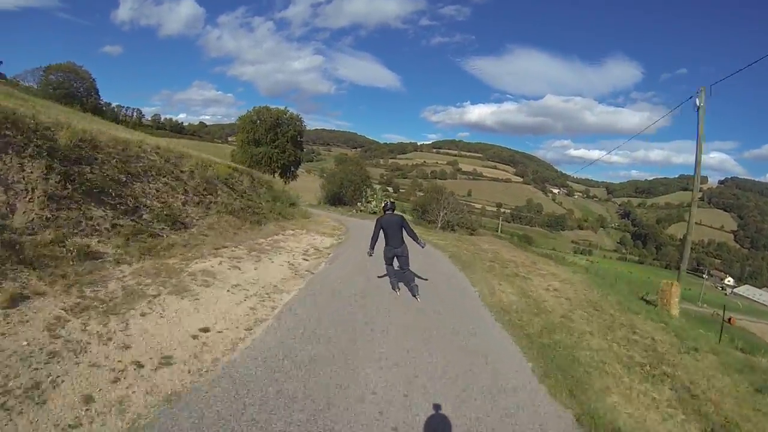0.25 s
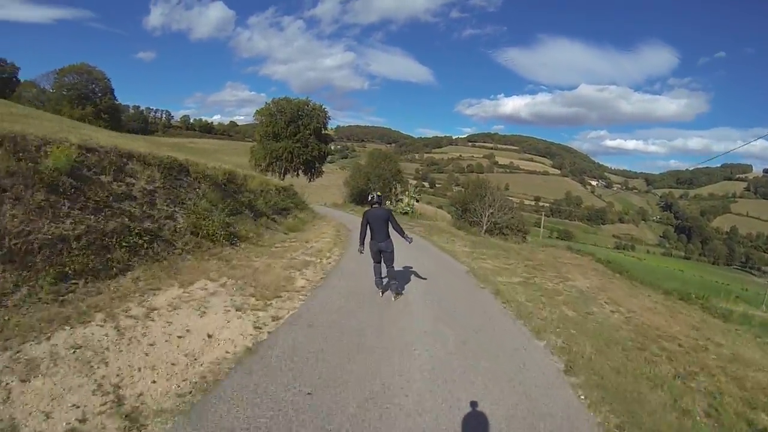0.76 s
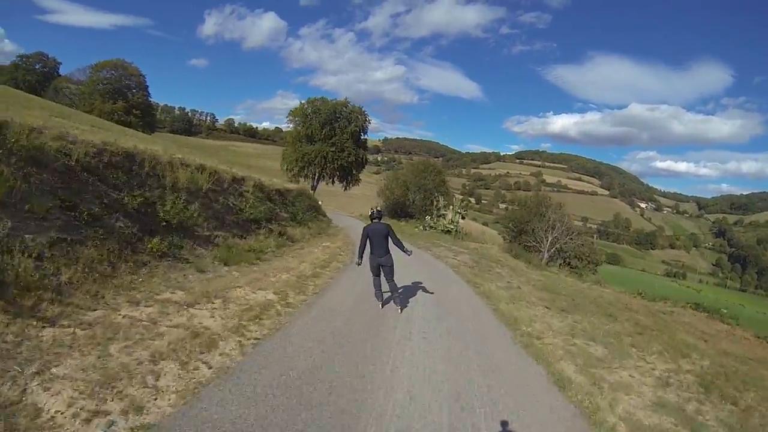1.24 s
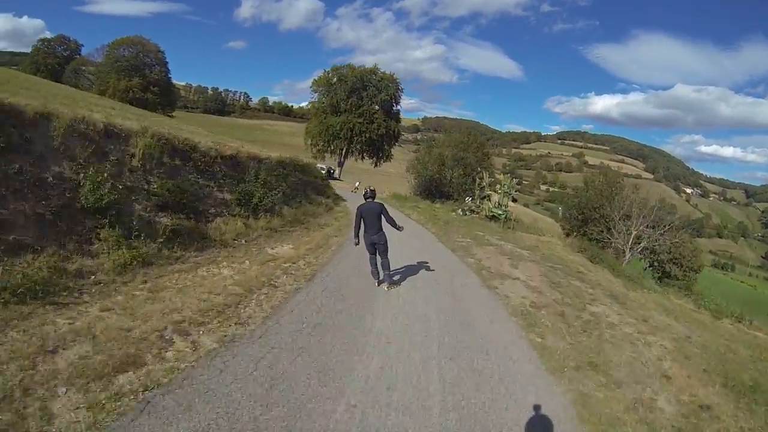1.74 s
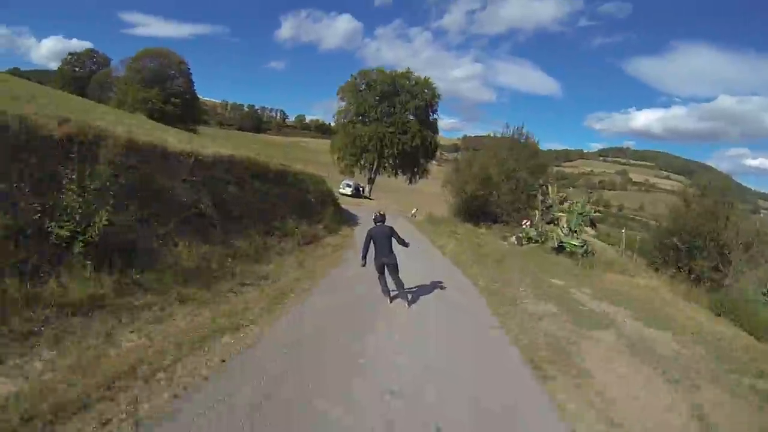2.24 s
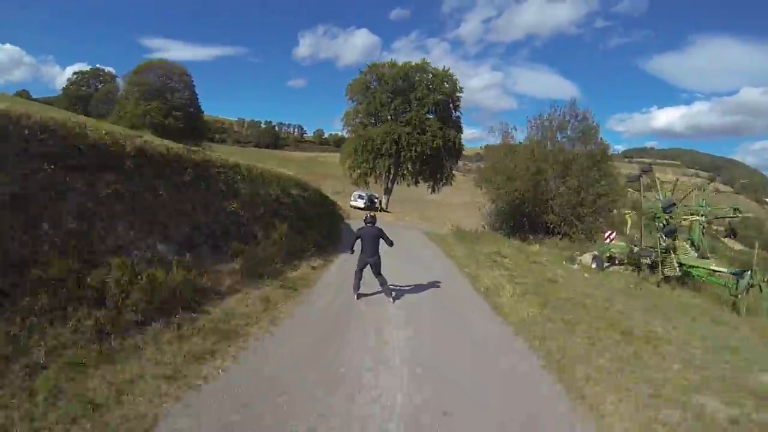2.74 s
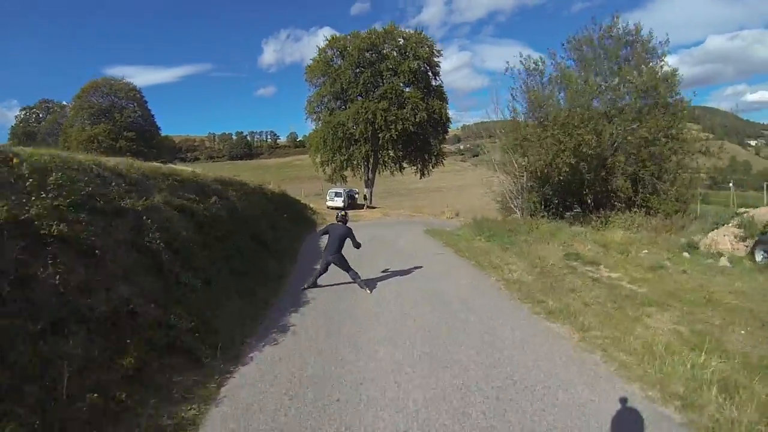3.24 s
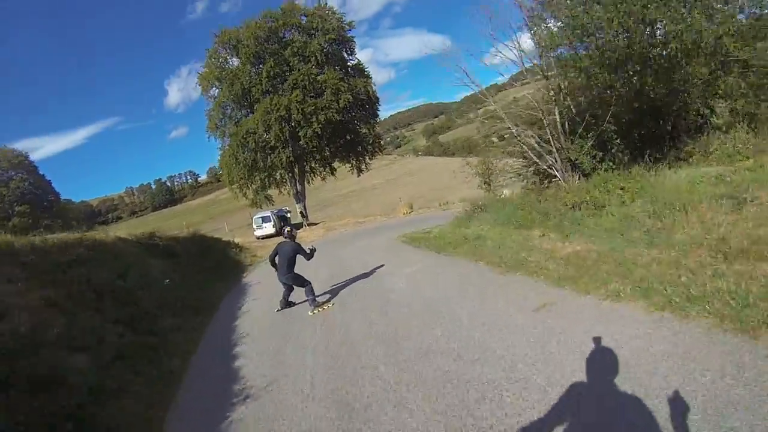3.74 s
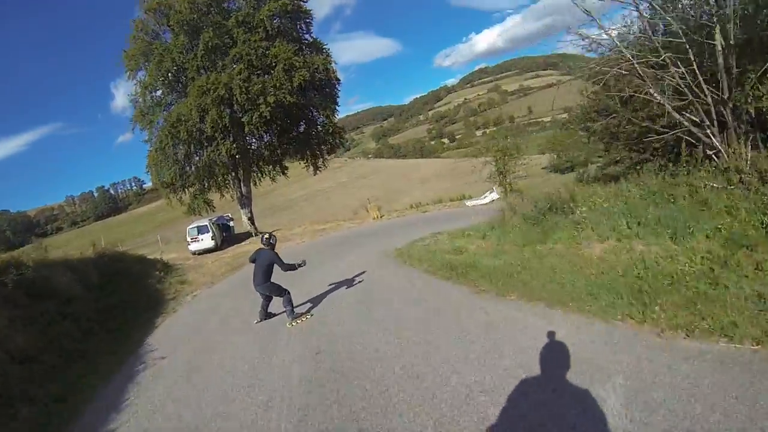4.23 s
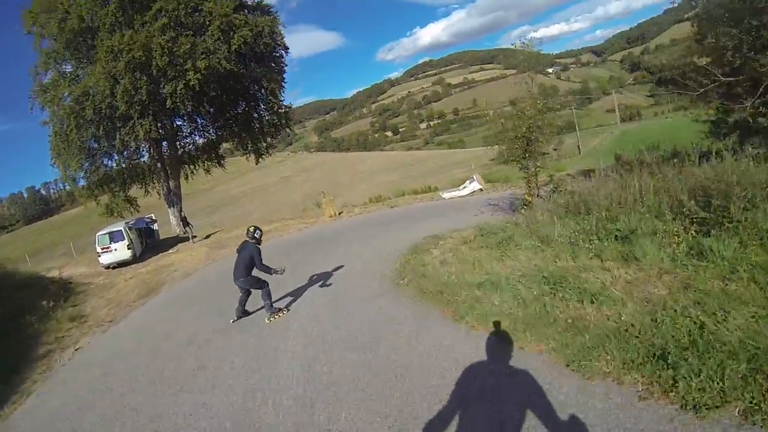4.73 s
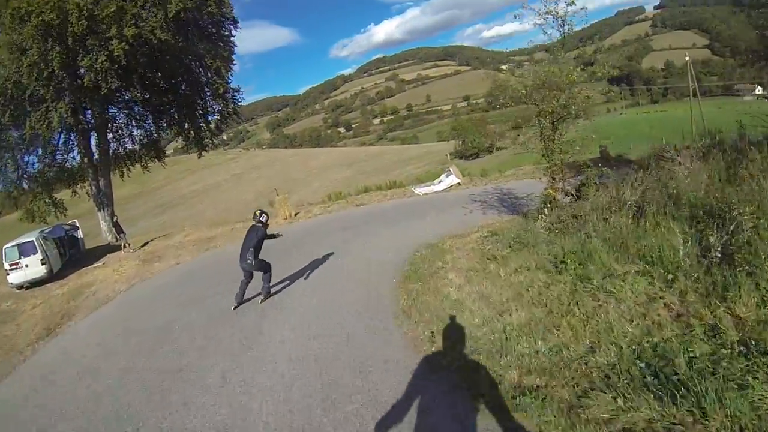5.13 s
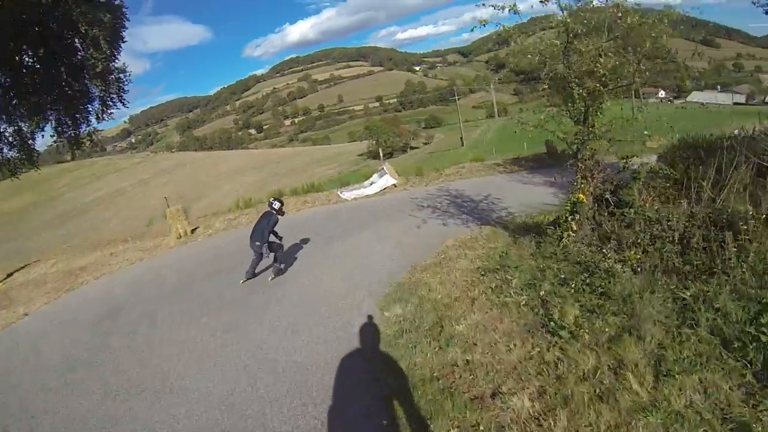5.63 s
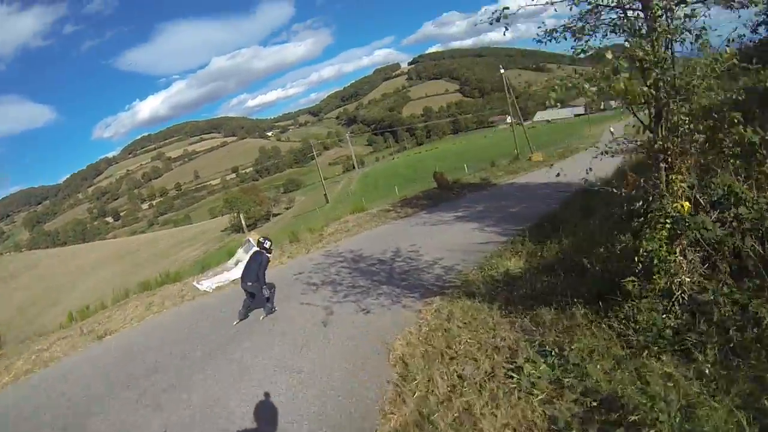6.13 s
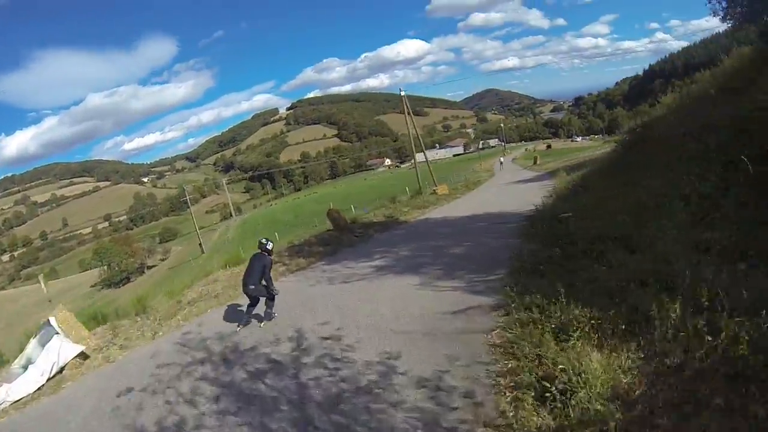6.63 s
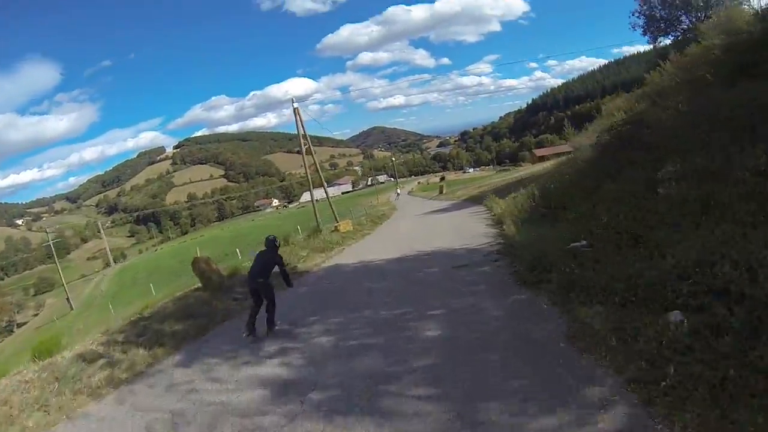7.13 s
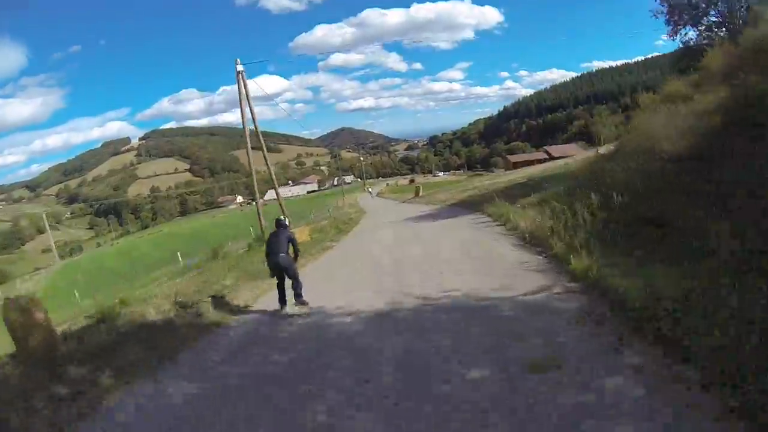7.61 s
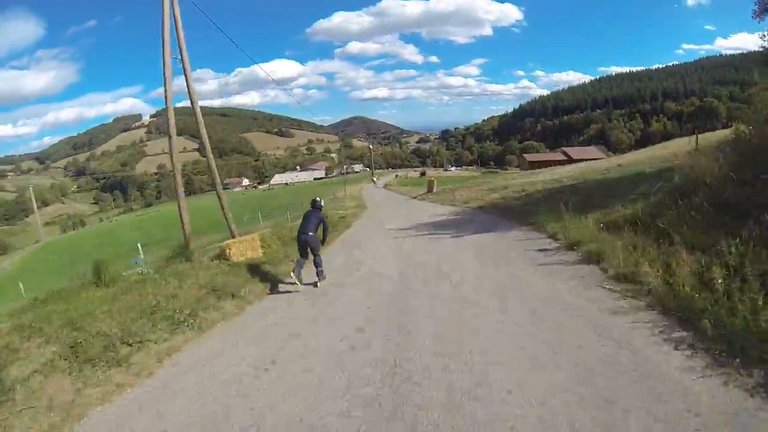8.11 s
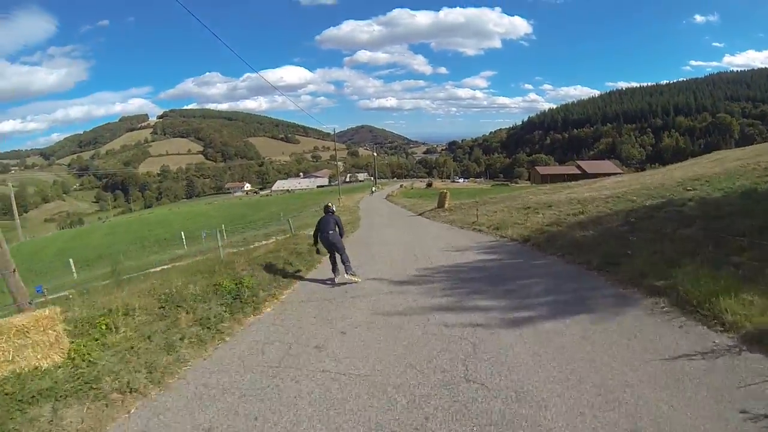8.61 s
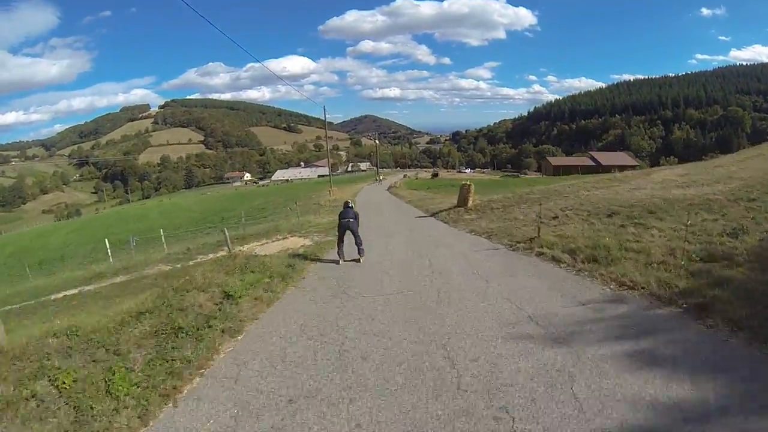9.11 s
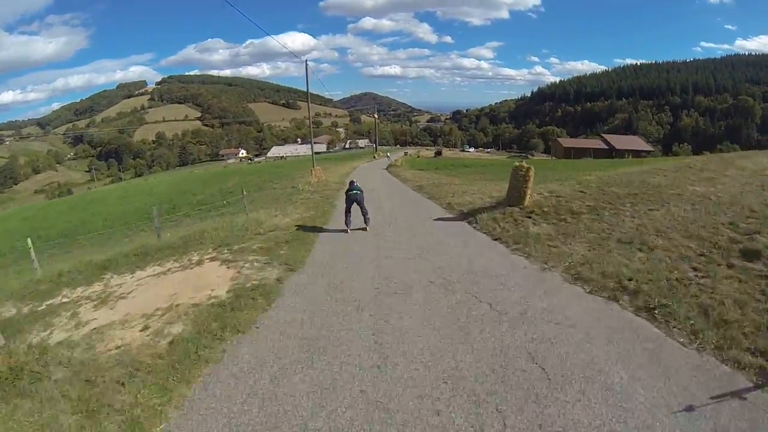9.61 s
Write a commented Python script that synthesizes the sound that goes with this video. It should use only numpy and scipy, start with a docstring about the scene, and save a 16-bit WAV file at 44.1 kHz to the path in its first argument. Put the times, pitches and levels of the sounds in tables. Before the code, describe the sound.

From 0 to 3.3 seconds, small hard skate wheels roar over coarse asphalt, mid-heavy and grainy with a gritty edge, while wind thumps deep and irregularly at a helmet microphone. Dull bumps knock near 0.2 and 1.5 seconds, with tiny high grit ticks; stronger knocks come at 2.9, 3.3 and 3.5. At 3.3 the skater brakes: a fine bright scrubbing hiss swells quickly, then slowly sags until about 5.2. The roar drops steeply from 4 seconds, exposing booming gusts and an airy cross rush around 4.5 to 5. Between 5.4 and 7.3 the wheels roll very quietly with a hollow singing tone, under gentler gusts and faint microphone hiss. From 7.4 pushes rasp softly, clearer at 9.1, 9.5 and 9.8, as rolling builds again, still below its opening level, with a light bump near 9. Open air, no echo.

```python
"""Inline skates, country road

A fast run heard from a microphone in the camera on the skater's helmet: wind at the housing, wheels a body length below.
Random stone hits ring the skates' resonances; they scrub and hiss into a bend, roll quietly through it, then pick up.
Shaped noise makes the wind, road shake and microphone hiss; short rings and decaying noise make grit and bumps."""
import sys
import numpy as np
from scipy import signal
from scipy.fft import rfft, irfft, next_fast_len
from scipy.io import wavfile
from scipy.ndimage import uniform_filter1d

SR = 44100
rng = np.random.default_rng(int(sys.argv[2]) if len(sys.argv) > 2 else 0)


def int16_out(signal):
    """Quantize to a 16-bit WAV file."""
    q = np.round(np.clip(np.atleast_2d(signal).T, -1, 1) * 32767)
    wavfile.write(sys.argv[1], SR, q.astype(np.int16))


N = 434818
TIME_S = np.arange(N) / SR

# Layer levels are before the trims set in scene(); colours give only a shape, scaled later.

# Microphone hiss, colour: pitch_hz, density_db (per Hz)
HISS_COLOUR = [(1000, -2), (4200, 7), (5200, 4.5), (6200, 1), (8000, -2.5), (9500, -7.5), (10050, 3),
               (11000, -4.5), (12000, -6), (12900, 3), (14400, -4), (15000, 0.5)]
# Thin whine in that hiss: pitch_hz, width_hz, lift_db
HISS_WHINE = [(12647, 14, 17), (12707, 12, 12), (13127, 14, 11)]

# Steady wind on the housing between gusts, with a lull in the bend: time_s, level_db
STEADY_WIND = [(0.0, -20), (0.55, -22), (0.87, -29.5), (1.2, -23), (1.35, -26.5), (2.0, -24), (2.2, -21.5),
               (2.85, -19.5), (3.2, -22.5), (3.9, -18.5), (4.28, -27.5), (4.6, -23.5), (5.05, -26),
               (5.65, -34.5), (6.05, -24), (7.4, -27), (8.3, -32), (9.86, -27)]
# Gusts: peak_time_s, peak_db, length_s (sigma of the power bell), boom_db (relative to the slow buffeting)
WIND_GUSTS = [(0.342, -16.5, 0.046, -5.5), (0.746, -23.5, 0.041, 8), (1.033, -23, 0.043, -11),
              (1.476, -13, 0.022, 7), (1.763, -20, .04, -4.5), (2.483, -17.5, 0.022, -3.5),
              (3.598, -15, .03, -5), (3.67, -18, 0.031, 17), (4.52, -16, 0.046, 3), (4.771, -19.5, .04, 3),
              (4.942, -18, .03, 10), (5.184, -18, 0.046, 2), (6.163, -20, 0.058, -1),
              (6.405, -20.5, 0.022, -11), (6.908, -21.5, 0.027, 1), (7.167, -21.5, 0.049, -4),
              (7.617, -22.5, 0.055, -7.5), (8.036, -27, 0.021, -4.5), (9.055, -27, 0.03, -12),
              (9.7, -26, 0.11, -15)]
# Slow buffeting of the housing, colour: pitch_hz, density_db (per Hz)
BUFFET_COLOUR = [(4, -22.5), (12, -3.5), (22, -7), (33, 2), (42, -1.5), (52, -10.5), (70, -21.5),
                 (150, -39)]
# Low boom of the housing, colour: pitch_hz, density_db (per Hz)
BOOM_COLOUR = [(35, -11), (52, -12), (64, -4), (75, 2.5), (86, -6.5), (98, -20.5), (112, -26), (200, -53)]
# Small, quick eddies, colour: pitch_hz, density_db (per Hz)
EDDY_COLOUR = [(60, -22), (95, 11.5), (125, 1.5), (160, -7), (220, -19.5), (500, -28)]
# Air rushing across the housing as the head turns in the bend: time_s, level_db
CROSSWIND_LEVEL = [(4.0, -61), (4.5, -53), (4.7, -47.5), (4.95, -56.5), (5.22, -54.5), (5.45, -74),
                   (5.95, -56.5), (7.6, -55.5), (8.4, -61)]
# That rush, colour: pitch_hz, density_db (per Hz)
RUSH_COLOUR = [(150, -23), (350, 3.5), (480, -4), (620, -1.5), (850, 0), (1150, 4), (1500, -17),
               (3000, -23), (4400, -32), (5200, -23), (6000, -34)]

# Road vibration carried up to the housing, weakest at the apex of the bend: time_s, level_db
DRONE_LEVEL = [(0.0, -36.5), (2.0, -38.5), (2.25, -35.5), (3.9, -39.5), (4.35, -46), (4.8, -48.5),
               (5.5, -56), (6.8, -51.5), (9.86, -44.5)]
# That vibration, colour: pitch_hz, density_db (per Hz)
DRONE_SHAPE = [(70, -7.5), (110, 7), (170, 3.5), (250, 0), (370, 0.5), (480, -9), (700, -20.5),
               (1500, -25.5)]

# Grit flicked by the wheels: start_s, level_db, ring_hz, t60_s
GRIT_TICKS = [(0.157, -43, 7200, .012), (1.456, -49, 10400, .02), (1.505, -53, 10800, .01),
              (3.7205, -41, 8400, .009), (3.722, -43, 10100, .009), (5.029, -58, 10500, .012)]
# Knocks of the wheels over bumps in the road: time_s, level_db, t60_s
ROAD_BUMPS = [(0.15, -29, 0.079), (0.265, -27, .06), (1.491, -25, 0.2), (2.88, -24.5, 0.35),
              (3.315, -24.5, 0.11), (3.54, -24, 0.27), (5.555, -44.5, 0.23), (7.575, -43, 0.25),
              (9.055, -34, .06), (9.45, -41, .07)]

# Ring of the wheels that stands out after the bend: time_s, level_db (relative to the roar)
SONG_LEVEL = [(4.2, -18), (5.1, -19), (5.5, -3), (6.3, -8), (7.2, -3), (8.2, -16), (9.2, -5), (9.86, -6.5)]
# That ring, colour: pitch_hz, density_db (per Hz)
SONG_SHAPE = [(700, -43.5), (950, -18), (1050, -3), (1120, 2), (1200, 0.5), (1300, -14), (1700, -41)]
# Pushes on the way out of the bend, when the edged wheels rasp: peak_time_s, level_db, length_s (sigma)
EDGE_PUSHES = [(7.45, -63, .04), (7.63, -58, 0.04), (7.86, -58, 0.078), (8.25, -64, 0.089),
               (8.56, -62, 0.093), (8.78, -59, 0.12), (9.084, -51, 0.093), (9.464, -52.5, 0.11),
               (9.78, -49, 0.055)]
# The rasp, colour: pitch_hz, density_db (per Hz)
RASP_COLOUR = [(2500, -14), (2780, -7), (3050, -4), (3480, 1), (3680, -4), (3950, -12), (4500, -13),
               (6000, -40)]
# The scrub, colour: pitch_hz, density_db (per Hz)
SCRUB_COLOUR = [(1500, 13), (2000, 26), (2550, 25), (3000, 6), (3500, 10), (4200, 11), (5200, 12),
                (6000, -2.5), (7700, 2.5), (9500, -4), (10500, 0.5), (11900, -5), (14000, -5.5),
                (15000, -13)]
# Resonances of the scrub: pitch_hz, width_hz, lift_db
SCRUB_RESONANCES = [(3720, 220, 8.7), (6500, 450, 8), (8220, 460, 11.6), (9040, 280, 8.9), (12500, 350, 4),
                    (13400, 700, 6)]

# Pace of the run as the roar of the wheels: fast straight, braking into the bend, picking up: time_s, level_db
ROAR_LEVEL = [(0.0, -27), (0.35, -27), (0.9, -28.5), (2.0, -29.5), (2.2, -26.5), (2.7, -27.5), (3.45, -27),
              (3.85, -29), (4.1, -32), (4.25, -36.5), (4.62, -39.5), (4.9, -40.5), (5.04, -45.5),
              (5.4, -49), (6.3, -51.5), (7.3, -48.5), (7.85, -42.5), (8.45, -42), (8.65, -40),
              (9.86, -37.6)]
# Broad colour of the rolling skates: pitch_hz, density_db (per Hz)
SKATE_COLOUR = [(250, -23), (480, -8), (660, -9), (900, -2.5), (1250, 0.5), (1720, 0.5), (2050, -11),
                (2620, -10.5), (2950, -18), (4200, -29), (5400, -28), (6000, -39), (8800, -41), (9400, -48),
                (15000, -57.5)]
# Resonances of wheels, frames and housing: pitch_hz, width_hz, lift_db
SKATE_RESONANCES = [(989, 36, 6), (1096, 157, 4.5), (1535, 130, 2.5), (2274, 194, 6.5), (2754, 120, 10),
                    (3320, 240, 5), (3667, 230, 6.5), (4020, 41, 8.5), (4468, 160, 10), (4680, 44, 7.5),
                    (4640, 30, 1), (5040, 280, 1), (5430, 14, -3), (6590, 230, 6.5), (7500, 500, 2),
                    (8050, 350, 2.5)]

# Bands in which the levels are given: low_hz, high_hz
ROAR_BAND, EDGE_BAND, TOP_BAND = (900, 3000), (3000, 6000), (9500, 15000)
BUFFET_BAND, BOOM_BAND, BLUSTER_BAND = (15, 55), (55, 110), (100, 200)
DRONE_BAND, RUSH_BAND = (170, 450), (450, 800)
CUTOFF_HZ = 15200

# Roar at full pace; edge and eddies give their level there and the dB they gain per dB of roar
FULL_PACE_DB = -27.5
EDGE_DB, EDGE_FOLLOWS = -17, 0.57  # sharp edge, relative to the roar
BLUSTER_DB, BLUSTER_FOLLOWS = -40.5, 0.79
BLUSTER_PER_GUST = 1  # dB per dB of wind power above its mean
BLUSTER_SLIDE_DB = 6  # added at full slide, side-on to the wind
USUAL_BOOM_DB = -2  # boom relative to buffeting in the steady wind
# The slide into the bend, until the wheels grip again
SLIDE_START_S, SLIDE_ATTACK_S = 3.31, 0.03
SLIDE_END_S, SLIDE_RELEASE_S = 5.18, 0.15
# The lean on the wheels' edges, until the road straightens
LEAN_START_S, LEAN_ATTACK_S = 4.04, 0.18
LEAN_END_S, LEAN_RELEASE_S = 7.3, 0.4
LEAN_SLIP, LEAN_EDGE_DB = 0.4, 5.0  # share of the slip that remains; added edge of the roar
# The scrub is loudest when the skater brakes hardest
SCRUB_DB, SCRUB_PEAK_S = -67, 3.42
SCRUB_RISE_DB_PER_S, SCRUB_SAG_DB_PER_S = 17, 4


def from_db(db):
    """Decibels to gain."""
    return 10 ** (np.asarray(db) / 20)


def curve(rows):
    """A two-column curve, drawn as straight lines with one value per sample."""
    points_s, values = np.transpose(rows)
    return np.interp(TIME_S, points_s, values)


def passage(rows, fade_s):
    """Gain of a level curve that fades in and out around its ends."""
    inside_s = np.minimum(TIME_S - rows[0][0], rows[-1][0] - TIME_S)
    return from_db(curve(rows)) * np.clip(inside_s / fade_s + 0.5, 0, 1)


def bell(peak_s, length_s):
    """A smooth swell with peak 1 and this sigma."""
    return np.exp(-0.5 * ((TIME_S - peak_s) / length_s) ** 2)


def held(start_s, attack_s, end_s, release_s):
    """A smooth attack, hold and release, 0-1."""
    attack = (1 + np.tanh((TIME_S - start_s) / attack_s)) / 2
    release = (1 - np.tanh((TIME_S - end_s) / release_s)) / 2
    return attack * release


def noise():
    """White noise over the whole run."""
    return rng.standard_normal(N)


def drift(rate_hz):
    """Slow random wander, its amplitude spectrum halved at this rate; spread 1."""
    size = next_fast_len(N)
    hz = np.fft.rfftfreq(size, 1 / SR)
    slow = irfft(rfft(rng.standard_normal(size)) / (1 + (hz / rate_hz) ** 2), size)[:N]
    return slow / slow.std()


def colour(x, spectrum, band, resonances=()):
    """Pass x through a body with a broad colour and resonances; rms 1 inside the band."""
    size = next_fast_len(N)
    hz = np.fft.rfftfreq(size, 1 / SR)
    points_hz, levels_db = np.transpose(spectrum)
    db = np.interp(np.log(hz + 1), np.log(points_hz), levels_db)
    db = db - 40 * np.log10(np.maximum(hz / points_hz[-1], 1))  # falls away above the last point
    for centre_hz, width_hz, lift_db in resonances:
        db = db + lift_db / (1 + ((hz - centre_hz) / width_hz) ** 2 * 2) ** 2
    shaped = rfft(x, size) * from_db(db)
    in_band = (hz >= band[0]) & (hz < band[1])
    power = 2 * np.sum(np.abs(shaped[in_band]) ** 2) / (size * N)
    return irfft(shaped / np.sqrt(power), size)[:N]


def steadied(x, span_s):
    """Even out the swells of x that are slower than the span."""
    local_power = uniform_filter1d(x ** 2, max(int(span_s * SR), 2))
    return x / np.sqrt(local_power + 1e-6)


def stone_hits(per_s, spread_db):
    """Random clicks of uneven size: wheels meeting the chippings of the road."""
    hit = rng.random(N) < per_s / SR
    extra_db = spread_db * np.minimum(rng.exponential(1, N), 4)
    return hit * noise() * from_db(extra_db)


def pace_db():
    """Level of the roar relative to full pace."""
    return curve(ROAR_LEVEL) - FULL_PACE_DB


def lean():
    """How far the wheels run on their edges, 0-1."""
    return held(LEAN_START_S, LEAN_ATTACK_S, LEAN_END_S, LEAN_RELEASE_S)


def slide():
    """How much the wheels slip sideways, 0-1: fully while braking, partly while leaning."""
    braking = held(SLIDE_START_S, SLIDE_ATTACK_S, SLIDE_END_S, SLIDE_RELEASE_S)
    return np.maximum(braking, LEAN_SLIP * lean())


def microphone_hiss(level_db):
    """The microphone's own steady noise, with thin whines in it."""
    return from_db(level_db) * colour(noise(), HISS_COLOUR, TOP_BAND, HISS_WHINE)


def wind_power():
    """Power of buffeting and boom: the steady wind plus a bell-shaped swell for each gust."""
    swells = [(from_db(curve(STEADY_WIND)) ** 2, USUAL_BOOM_DB)]
    for peak_s, peak_db, length_s, boom_db in WIND_GUSTS:
        swells.append((from_db(peak_db) ** 2 * bell(peak_s, length_s), boom_db))
    # each swell's power is shared out by its boom balance
    buffet = sum(power / (1 + from_db(boom_db) ** 2) for power, boom_db in swells)
    boom = sum(power / (1 + from_db(-boom_db) ** 2) for power, boom_db in swells)
    return buffet, boom


def housing_thumps(buffet_power, boom_power, buffet_db, boom_db, housing_hz):
    """Eddies push on the closed housing, which lets through mostly slow thumps and a low boom."""
    buffet = steadied(colour(noise(), BUFFET_COLOUR, BUFFET_BAND), span_s=0.23)
    boom = steadied(colour(noise(), BOOM_COLOUR, BOOM_BAND), span_s=0.2)
    thumps = from_db(buffet_db) * np.sqrt(buffet_power) * buffet
    thumps = thumps + from_db(boom_db) * np.sqrt(boom_power) * boom
    lowpass = signal.butter(8, housing_hz, fs=SR, output="sos")
    return signal.sosfiltfilt(lowpass, thumps)


def bluster(power):
    """Small, quick eddies grow with the pace, the gusts and the slide."""
    gust_db = 10 * np.log10(power / power.mean())
    level_db = BLUSTER_DB + BLUSTER_FOLLOWS * pace_db() + BLUSTER_PER_GUST * gust_db
    level_db = level_db + BLUSTER_SLIDE_DB * slide()
    return from_db(level_db) * steadied(colour(noise(), EDDY_COLOUR, BLUSTER_BAND), span_s=0.17)


def crosswind(rush_db, flutter_db):
    """Air rushes across the housing as the head turns: fluttering, coloured noise."""
    flutter = noise() * from_db(flutter_db * drift(20))
    rush = colour(flutter, RUSH_COLOUR, RUSH_BAND)
    return from_db(rush_db) * passage(CROSSWIND_LEVEL, fade_s=0.26) * rush


def wind(buffet_db, boom_db, rush_db, flutter_db, housing_hz):
    """Moving air at the housing: thumps, quick eddies and a cross rush."""
    buffet_power, boom_power = wind_power()
    thumps = housing_thumps(buffet_power, boom_power, buffet_db, boom_db, housing_hz)
    return thumps + bluster(buffet_power + boom_power) + crosswind(rush_db, flutter_db)


def drone(level_db, shake_db):
    """The coarse road shakes skater and housing."""
    shaking = noise() * from_db(shake_db * drift(25))
    return from_db(curve(DRONE_LEVEL) + level_db) * colour(shaking, DRONE_SHAPE, DRONE_BAND)


def ticks(crack):
    """Each bit of grit gives a tiny crack and a short high ring."""
    out = np.zeros(N)
    t = np.arange(SR // 20) / SR
    for start_s, level_db, ring_hz, t60_s in GRIT_TICKS:
        ring = np.sin(2 * np.pi * ring_hz * t)
        burst = ring + crack * rng.standard_normal(len(t))
        start = int(start_s * SR)
        out[start:start + len(t)] += burst * from_db(level_db - 60 * t / t60_s)
    return out


def bumps(level_db, spread_s):
    """The wheels of a skate cross a bump one after another and ring the same body."""
    blows = np.zeros(N)
    for time_s, bump_db, t60_s in ROAD_BUMPS:
        since_s = TIME_S - time_s
        arrived = np.clip(since_s / spread_s + 1, 0, 1)  # a ramp up to the knock
        blows += arrived * from_db(bump_db - np.clip(60 * since_s / t60_s, 0, 200))
    return from_db(level_db) * blows * colour(noise(), SKATE_COLOUR, ROAR_BAND, SKATE_RESONANCES)


def wheel_song(level_db, waver_db):
    """Lightly loaded wheels are less damped and sing a hollow note."""
    hits = stone_hits(per_s=3000, spread_db=-1.0) * from_db(waver_db * drift(10))
    song_db = curve(ROAR_LEVEL) + curve(SONG_LEVEL) + level_db
    return from_db(song_db) * colour(hits, SONG_SHAPE, ROAR_BAND)


def rasps(level_db, chatter_db):
    """Each push drags the wheels a little sideways and rings the frame."""
    pressure = sum(from_db(push_db) * bell(peak_s, length_s) for peak_s, push_db, length_s in EDGE_PUSHES)
    slips = stone_hits(per_s=7500, spread_db=-6.0) * from_db(chatter_db * drift(35))
    return from_db(level_db) * pressure * colour(slips, RASP_COLOUR, EDGE_BAND)


def scrub(chatter_db):
    """Slipping wheels move in tiny jerks: a fine bright hiss that swells, then sags as the skater slows."""
    slips = stone_hits(per_s=16000, spread_db=0.0) * from_db(chatter_db * drift(40))
    late_s = TIME_S - SCRUB_PEAK_S
    level_db = SCRUB_DB + np.minimum(SCRUB_RISE_DB_PER_S * late_s, -SCRUB_SAG_DB_PER_S * late_s)
    return from_db(level_db) * slide() * colour(slips, SCRUB_COLOUR, TOP_BAND, SCRUB_RESONANCES)


def wheels(roar_db, judder_db, judder_rate_hz, edge_hz, unlike_db, sway_rate_hz, surge_db, surge_rate_hz):
    """Stone hits ring two skates that share the weight in turn; faster, harder hits carry more treble."""
    # coarser and finer patches of asphalt
    level_db = curve(ROAR_LEVEL) + surge_db * drift(surge_rate_hz)
    edge_db = EDGE_DB + EDGE_FOLLOWS * pace_db() + LEAN_EDGE_DB * lean()
    judder = from_db(judder_db * drift(judder_rate_hz))
    sway = np.tanh(drift(sway_rate_hz))
    roar = 0
    for side in (1, -1):
        # each skate favours other resonances
        resonances = [(hz, width_hz, lift_db + side * unlike_db * (-1) ** k)
                      for k, (hz, width_hz, lift_db) in enumerate(SKATE_RESONANCES)]
        hits = stone_hits(per_s=9000, spread_db=-0.16) * judder
        roar = roar + np.sqrt(1 + side * sway) * colour(hits, SKATE_COLOUR, ROAR_BAND, resonances)
    roar = steadied(roar, span_s=0.2)
    # set the treble's own level, leaving the body of the roar alone
    highpass = signal.butter(4, edge_hz, "high", fs=SR, output="sos")
    treble = signal.sosfiltfilt(highpass, roar)
    edge_bandpass = signal.butter(4, EDGE_BAND, "band", fs=SR, output="sos")
    usual_edge = signal.sosfilt(edge_bandpass, treble).std()
    body = roar - treble
    return from_db(level_db + roar_db) * (body + treble * from_db(edge_db) / usual_edge)


def scene():
    """Microphone hiss and wind close at the housing, then the road and the skates below."""
    hiss = microphone_hiss(level_db=-79.0)
    air = wind(buffet_db=1.5, boom_db=0.6, rush_db=-2.5, flutter_db=1.0, housing_hz=118)
    road = drone(level_db=-0.6, shake_db=1.5)
    knocks = ticks(crack=0.3) + bumps(level_db=-1.0, spread_s=0.0089)
    song = wheel_song(level_db=-2.0, waver_db=0.0)
    slides = rasps(level_db=-6.0, chatter_db=-0.5) + scrub(chatter_db=0.8)
    skates = wheels(roar_db=0.23, judder_db=0.45, judder_rate_hz=12, edge_hz=3010, unlike_db=1.5,
                    sway_rate_hz=2.7, surge_db=0.58, surge_rate_hz=2.6)
    return (hiss + air + road + knocks + song + slides + skates)[None]


def record(dry):
    """The top is cut steeply."""
    lowpass = signal.ellip(14, 0.1, 80, CUTOFF_HZ, fs=SR, output="sos")
    return signal.sosfilt(lowpass, dry)


dry = scene()
out = record(dry)
int16_out(out)
```